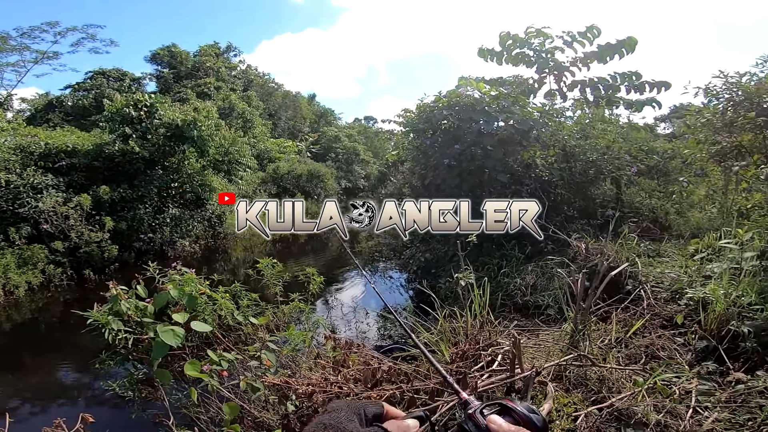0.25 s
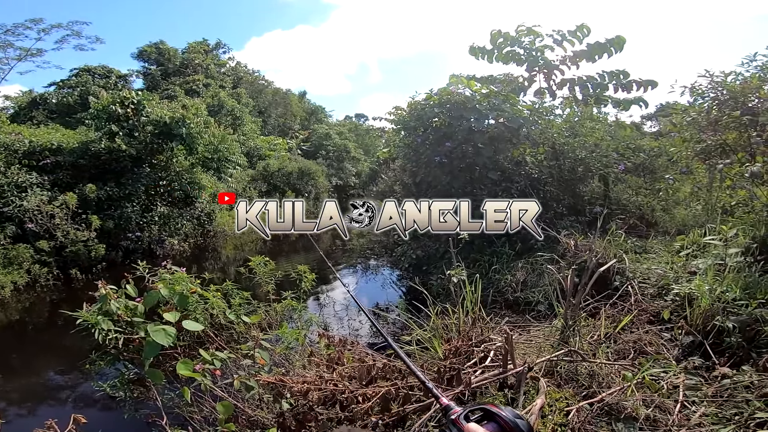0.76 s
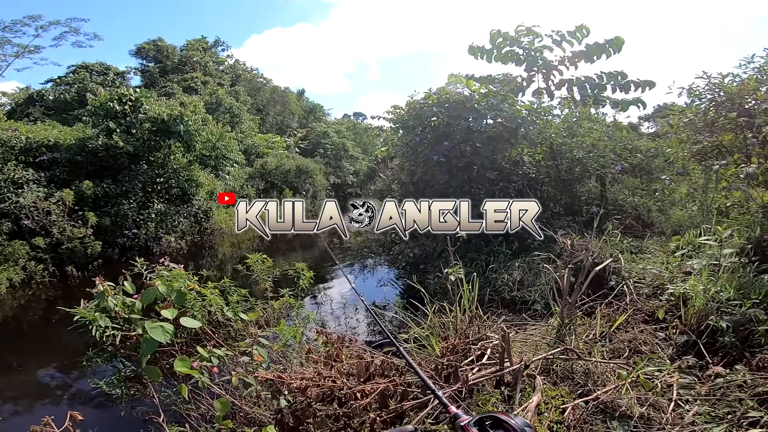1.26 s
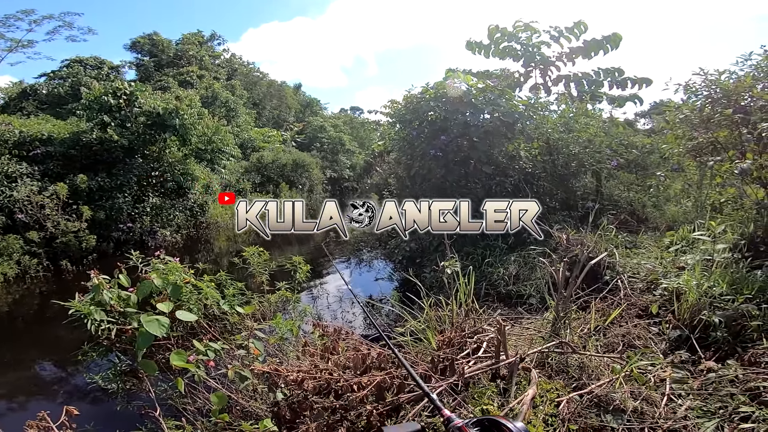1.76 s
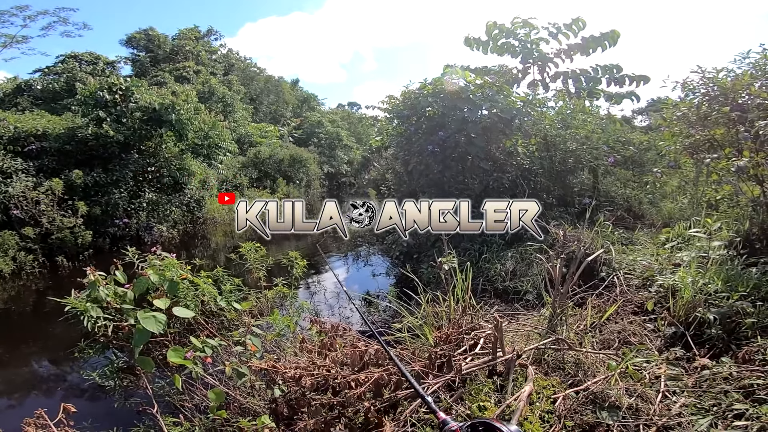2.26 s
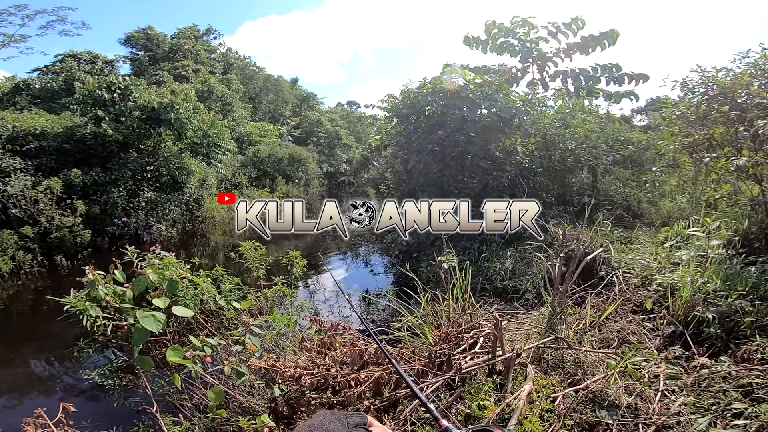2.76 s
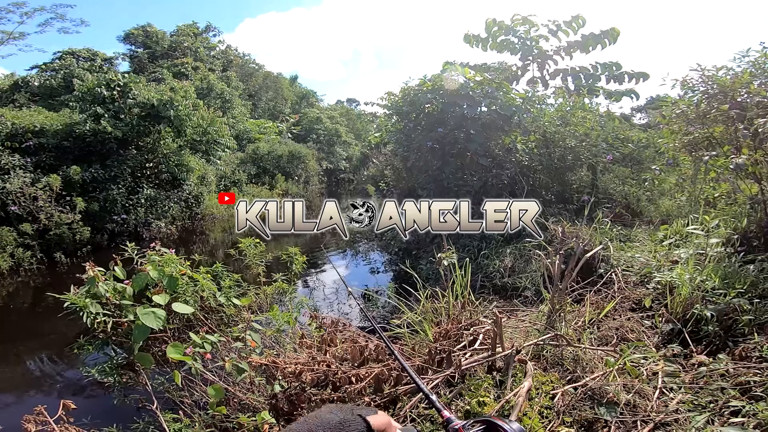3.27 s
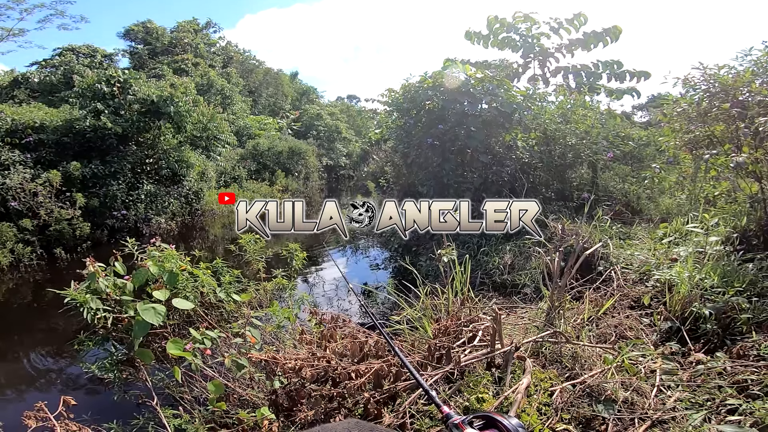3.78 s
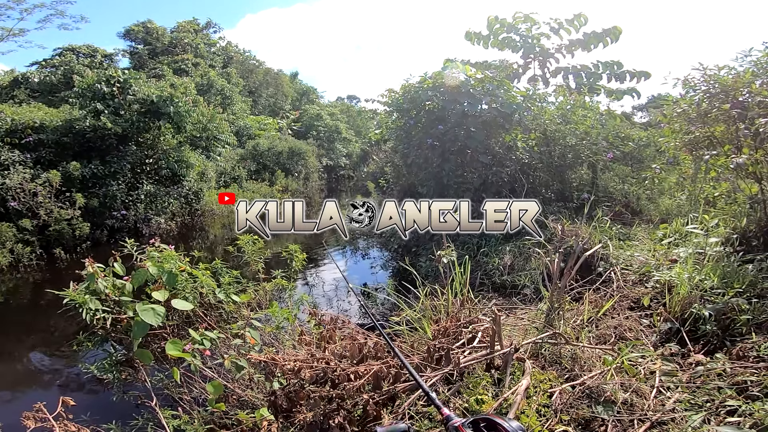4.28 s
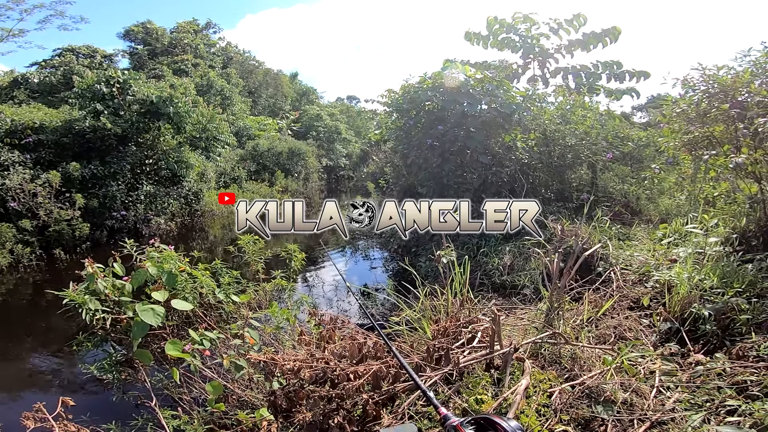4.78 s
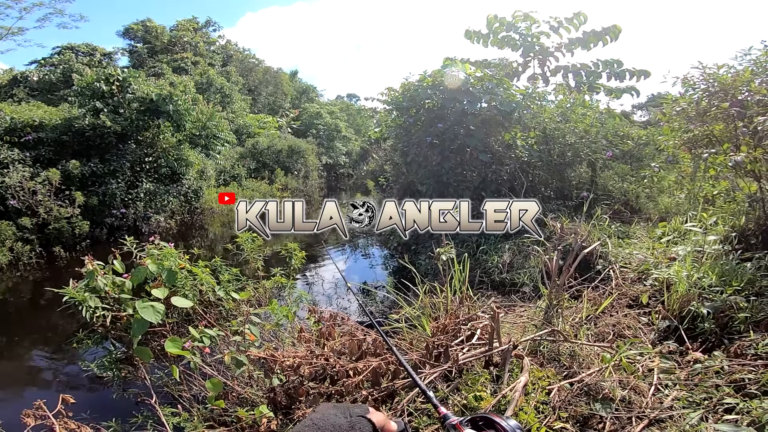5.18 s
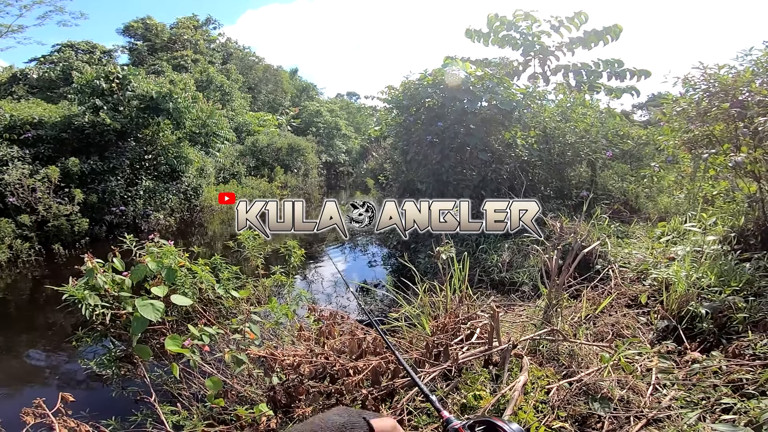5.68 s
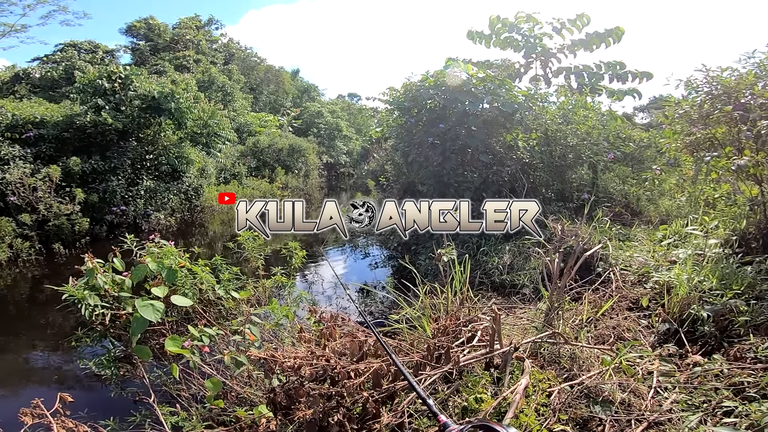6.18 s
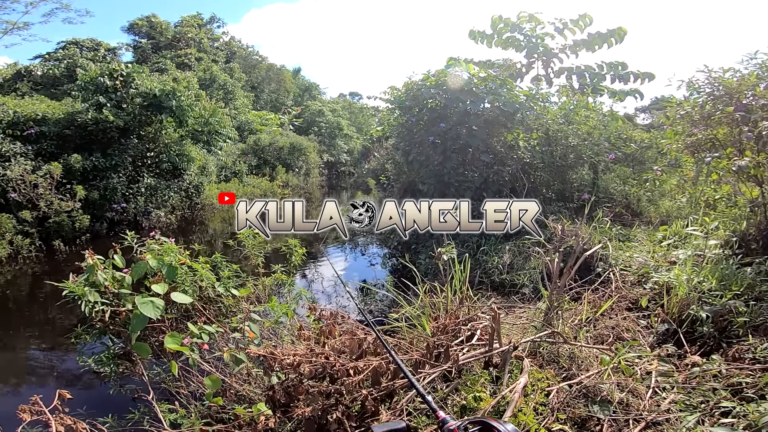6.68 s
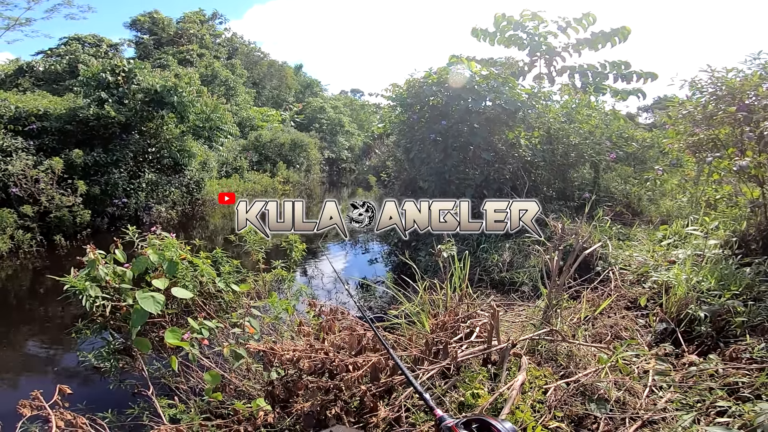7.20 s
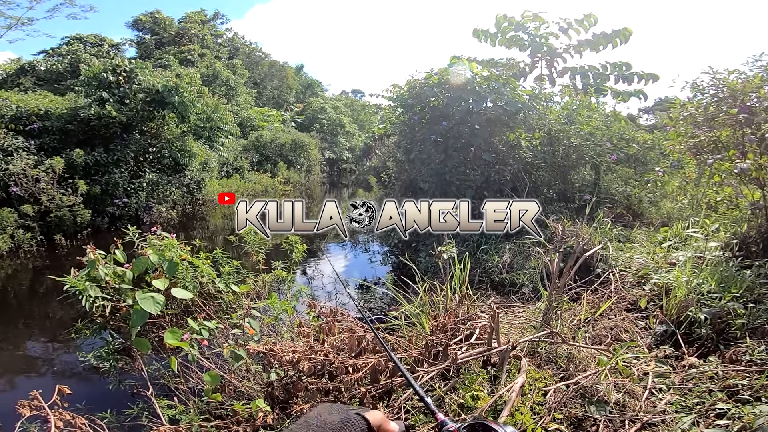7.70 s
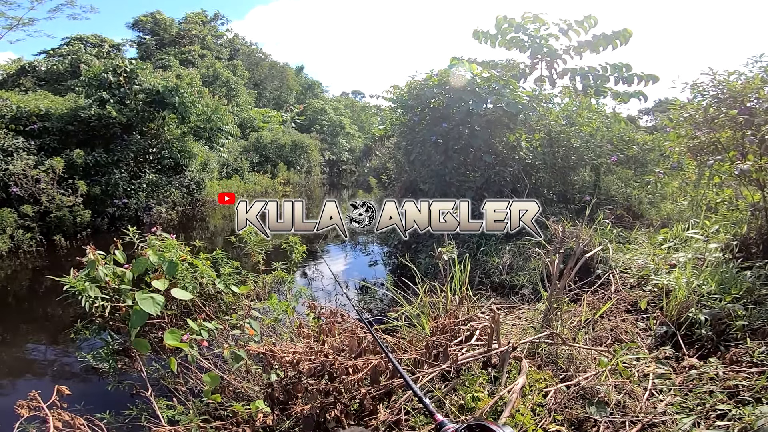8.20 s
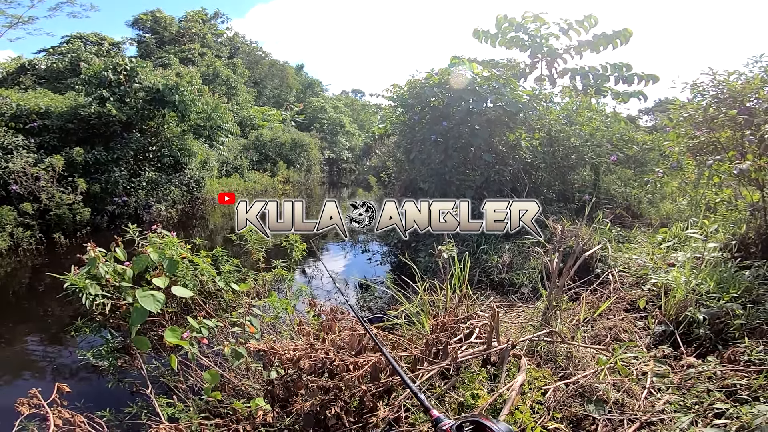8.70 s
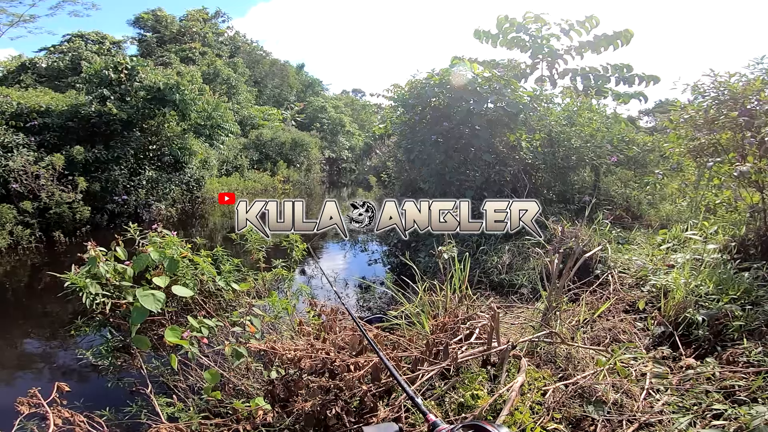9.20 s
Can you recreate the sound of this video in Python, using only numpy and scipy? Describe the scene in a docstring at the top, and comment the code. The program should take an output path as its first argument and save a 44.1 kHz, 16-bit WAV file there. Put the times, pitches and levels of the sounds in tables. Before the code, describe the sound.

A quiet outdoor pond bank: insects hum on a high pitch throughout, leaning left, over a light breeze in leaves. A distant motor drones and fades, while a second hums faintly, growing a little toward the end. Birds chatter harshly during the first second, and a fishing reel snaps shut close by at about 0.3 seconds. Small water plops follow from 1.3 to 2.2 seconds. From about 1.2 seconds a far bird pips softly, nearly three times a second. Around 2 seconds a cricket starts a fast, high trill on the left and keeps going, as the sound widens into stereo. The microphone is knocked lightly at 2.1, 4.4 and 5.2 seconds, the last with a squeaky rub. Birds chatter again from 4.6 to 6.2 seconds. Faint plops come near 7.6 seconds. Dry stems tick and cloth rustles here and there, more often after 8.5 seconds.

```python
"""Insects hum high in the reeds of a still swamp pond, their wings ringing in narrow bands.
A cricket starts up on the left, one tone per wing stroke, and far birds pip and chatter.
An angler's reel snaps shut, gear knocks and rubs on the microphone housing, dry stems and cloth
rustle, and air pockets ring as something plops in the water. Behind it all a distant motor
drones and fades, another hums on, and a light breeze stirs the leaves."""
import sys
import numpy as np
from scipy import signal
from scipy.fft import rfft, irfft
from scipy.io import wavfile
from scipy.ndimage import uniform_filter1d

SR = 44100
rng = np.random.default_rng(int(sys.argv[2]) if len(sys.argv) > 2 else 0)


def unload_audio(sound):
    """Save the sound as a 16-bit wav file, at the path given as the first command line argument."""
    columns = np.transpose(np.atleast_2d(sound))
    # keep every value between -1 and 1, then stretch to whole-number steps
    steps = np.round(np.clip(columns, -1, 1) * 32767)
    wavfile.write(sys.argv[1], SR, steps.astype(np.int16))


N = 416744
T = np.arange(N) / SR

# Table levels are relative: the functions add their own gain. Ring time is the time to fade by 60 dB.
# Kinds of insect. Each row: pitch in Hz, band width in Hz, level in dB, lean to the left in dB,
# pulses per second, pulse depth from 0 to 1.
INSECT_BANDS = [(7140, 450, -5, 13, 23, 0.34), (7190, 520, -4.5, -12, 90, 0.33),
                (6920, 500, -8.5, 19, 59.9, 0.2), (7570, 320, -13.5, 26.5, 120, 0.2),
                (5050, 1400, -11, 7, 16, 0.13), (9060, 730, -20, 2, 19.95, 0.1),
                (8080, 460, -15, 8, 30, .2)]
# How loud the insects are together. Each row: time in seconds, level in dB.
CHORUS_LEVEL = [(0, -64.5), (.6, -62.5), (2.3, -64.5), (3.4, -61.5), (6.5, -61), (9.45, -59.5)]
# The near cricket warms up, then holds steady. Each row: time in seconds, level in dB.
CRICKET_LEVEL = [(0, -81), (1.85, -68), (2.1, -56), (2.8, -51.5), (4.1, -49), (5.3, -52), (9.45, -51)]
# The near cricket's rests. Each entry: middle of the rest in seconds.
CRICKET_RESTS = [2.705, 3.825]
# Far crickets. Each row: pitch in Hz, level against the chorus in dB, chirps per second,
# lean to the left in dB, chirp length in beats, time of one chirp in seconds.
FAR_CRICKET_SONGS = [(8280, -11.5, 15.0, -4, .8, .02), (8100, -12.5, 15.6, 14, 0.65, 0.2),
                     (6080, -20, 31, 11.5, 1.3, 0), (4820, -17.5, 2.65, 11, .45, 7.05)]
# The chattering birds' notes. Each row: middle in seconds, level in dB, pitch in Hz,
# fall in Hz (negative rises), roughness (0 is pure), length in seconds.
CHATTER_NOTES = [(.023, -46, 3040, 600, 1.1, 0.046), (.12, -42, 2895, 1100, 0.7, .052),
                 (0.207, -41, 3100, -300, 0.6, 0.038), (0.401, -40, 2990, 350, 0.5, 0.043),
                 (.549, -47.5, 3110, -150, .7, 0.073), (.654, -43, 3000, 100, 0.66, 0.033),
                 (0.769, -44, 3040, 102, .64, 0.046), (0.898, -45.5, 3125, -150, 0.86, 0.066),
                 (4.572, -55, 2710, 600, .7, .052), (4.671, -50, 2485, 600, 0.6, 0.056),
                 (4.772, -49, 2610, 900, 0.7, 0.04), (4.875, -44, 2660, 1100, 0.8, 0.054),
                 (4.944, -42, 2620, -600, 0.3, 0.02), (4.979, -47, 2350, 950, 0.94, .07),
                 (5.071, -45, 2340, 797, 0.75, .052), (5.159, -42.5, 2600, 900, 1, .052),
                 (5.347, -47, 2370, 898, 0.83, .052), (5.433, -44.5, 2550, 1103, .7, 0.061),
                 (5.539, -44.5, 2606, 902, 0.9, .052), (5.631, -48, 2380, 1000, 0.75, .052),
                 (5.702, -49.5, 2690, 600, 0.8, .052), (5.829, -48.5, 2350, 1100, .8, .052),
                 (5.967, -48.5, 2540, 700, .7, .052), (6.135, -50, 2716, 500, 1, .052)]
# Hits inside the reel. Each row: start in seconds, level in dB, brightness in Hz.
REEL_HITS = [(0.231, -5, 660), (0.2327, -8, 600), (0.2562, -24, 3500), (0.2628, -22, 3000),
             (0.2661, -12.5, 6000), (0.2666, -10.5, 10000), (0.2671, -11, 4040), (0.2687, -21, 8000),
             (0.2736, -26, 8000), (0.2742, -21, 5000), (0.2778, -11, 3400), (0.2863, -31, 3000),
             (.3380, -19, 2600), (0.3393, -9, 1210), (0.34, -10, 696), (0.3523, 9, 170)]
# How the reel's frame rings. Each row: pitch in Hz, level in dB, ring time in seconds.
REEL_MODES = [(298, -34, 0.0089), (860, -17, 0.004), (1100, -24, 0.0033), (1730, -4.5, 0.0088),
              (2280, -3, 0.0068), (2770, 5, 0.0071), (3250, -1.5, 0.0074), (3860, -12, 0.02),
              (4550, -8.5, 0.013), (5600, -14.5, 0.0054), (6600, -5, 0.0031), (10440, 1, 0.0013)]
# Knocks on the housing. Each row: start in seconds, level in dB, brightness in Hz.
HOUSING_KNOCKS = [(2.0988, -15, 2620), (4.3567, -13, 2630), (5.2264, -14.5, 1910)]
# How the housing rings. Each row: pitch in Hz, level in dB, ring time in seconds.
HOUSING_MODES = [(420, -29, 0.038), (780, -21, .014), (1001, 7, 0.02), (1410, -12, 0.022),
                 (1560, -4, 0.011), (1870, -33, .016), (2230, -17, 0.042), (3070, -11, 0.02),
                 (3420, -18, 0.0067), (5600, -21, 0.014)]
# The jolt of the whole device. Each row: pitch in Hz, level in dB, ring time in seconds.
JOLT_MODES = [(373, -25.5, 0.022)]
# Clothing rubs the housing. Each row: middle in seconds, level in dB, length in seconds.
CLOTH_RUBS = [(2.266, -50, 0.037), (3.69, -45.5, 0.046), (5.266, -34.5, 0.046), (6.967, -50, 0.055),
              (7.535, -46.5, 0.057), (7.761, -49, 0.037), (8.57, -48, 0.057), (9.24, -50, 0.044),
              (9.376, -49, 0.088)]
# Rubbing squeaks. Each row: middle in seconds, level in dB, length in seconds, pitch in Hz, glide in Hz.
RUB_SQUEAKS = [(5.241, -40, 0.01, 2520, -90), (5.253, -39, .005, 2400, 0), (5.247, -36, .008, 1320, 63),
               (5.269, -25.5, .011, 983, 4), (5.29, -38, 0.009, 1310, 0), (6.978, -48, .055, 1080, -320),
               (6.95, -52, .05, 1510, -450), (8.583, -47, 0.0242, 982, 82), (8.802, -49, .028, 1020, 66),
               (8.863, -49, 0.038, 2020, 160), (9.39, -46, 0.014, 1290, 62)]
# Plops. Each row: start in seconds, level in dB, starting pitch in Hz, thud against the ring in dB.
WATER_PLOPS = [(1.303, -35.5, 773, -4), (1.316, -35, 653, -4), (1.332, -43, 1650, -20),
               (1.344, -43, 668, 2), (1.371, -43, 700, -2), (1.3735, -46, 1250, -12), (1.454, -44, 804, -8),
               (1.497, -45, 950, -10), (1.512, -45, 980, -15), (1.629, -37.5, 847, -9),
               (1.643, -40, 821, -12), (1.688, -45, 1080, -6), (1.697, -41, 860, -4), (1.715, -39, 740, -5),
               (1.763, -34.5, 785, -9), (1.982, -46, 1130, -10), (2.225, -45.5, 1450, -20),
               (7.513, -48, 1016, -10), (7.658, -46, 1262, -20), (7.768, -53, 1016, -12)]
# Stems and cloth rustle. Each row: middle in seconds, level in dB, length in seconds, pitch in Hz.
CLEAR_RUSTLES = [(0.035, -52.5, 0.18, 2550), (0.746, -59.5, 0.23, 1820), (1.339, -51, 0.043, 580),
                 (1.45, -56.5, 0.1, 1540), (1.72, -54, 0.068, 1100), (1.981, -47, 0.018, 1080),
                 (2.123, -47, 0.037, 347), (2.315, -63, .06, 1500), (2.366, -55.5, 0.13, 382),
                 (3.957, -59, 0.23, 390), (5.263, -52, 0.04, 2300), (6.962, -61, .06, 2200),
                 (7.73, -61, 0.08, 1217), (8.815, -57.5, 0.15, 2050), (9.068, -57, 0.038, 800),
                 (9.12, -58, .06, 1700), (9.40, -57, 0.066, 2220)]
# Dry stems tick. Each row: start in seconds, level in dB, factor on the stem's pitches.
STEM_TICKS = [(.6548, -39, 0.98), (.8613, -41, .8), (1.3026, -40, 1.17), (1.8863, -30.5, 0.85),
              (2.735, -39.5, 1), (3.341, -40, 0.88), (3.722, -45, 1.4), (3.94, -37, 0.82),
              (4.041, -44, 1.1), (4.3087, -39, 1.16), (5.219, -38, 0.7), (5.26, -33, 0.76),
              (5.2655, -35, 0.78), (5.2837, -35, 0.9), (5.294, -42, .85), (5.525, -40, 1.1),
              (6.7698, -38, .98), (6.7708, -41, 1.2), (7.26, -45, 0.7), (7.658, -42, 0.56),
              (7.71, -39, .45), (7.723, -41, .85), (7.768, -45, .55), (8.556, -42, 0.8), (8.577, -38, 0.89),
              (8.743, -38, 0.8), (8.769, -40, 0.89), (8.7997, -39, 0.84), (8.826, -42, 0.72),
              (8.871, -41, .8), (9.088, -44, 1.05), (9.125, -42, 0.61), (9.345, -41, 0.59),
              (9.365, -37, 0.83), (9.388, -43, 0.83)]
# How a dry stem rings. Each row: pitch in Hz, level in dB, ring time in seconds.
STEM_MODES = [(1830, 6.5, 0.0056), (2500, 3.5, .007), (3200, 8.5, 0.0056), (4500, 0, 0.0022),
              (5550, -5, 0.0049), (8900, -17, 0.0034)]
# How loud the motor's dull noise is. Each row: time in seconds, level in dB.
WASH_LEVEL = [(0, -52.5), (.6, -55), (1.05, -57.5), (1.4, -52), (2.1, -51), (2.6, -58), (4.0, -60),
              (4.6, -63), (5.8, -61.5), (6.3, -65.5), (7.4, -61.5), (8.6, -64.5), (9.2, -60), (9.45, -61)]
# The colour of that noise. Each row: frequency in Hz, level in dB.
WASH_SPECTRUM = [(76, -48), (130, -8.5), (157, -1.5), (231, -4), (289, -8), (510, -14.5), (592, -8.5),
                 (960, -16.5), (1200, -45), (1560, -62), (2640, -120)]
# The second engine. Each row: time in seconds, pitch in Hz, note level in dB, throb level in dB.
ENGINE_RUN = [(0, 134, -78, -86), (2.7, 131, -72, -81), (3.6, 127.2, -70, -68), (4.9, 126, -68, -73),
              (5.3, 122, -63, -66), (6.1, 120, -66, -61), (6.6, 119.9, -71.5, -81),
              (7.3, 120.6, -64.5, -64), (8.3, 126.7, -66.5, -66), (9.1, 132.6, -63, -57),
              (9.45, 131, -66, -55)]
# Moving air. Each row: time in seconds, rumble level in dB, leaf level in dB.
BREEZE_LEVELS = [(0, -60.5, -57), (.75, -68.5, -56), (1.1, -65, -58.5), (1.9, -66, -56.5),
                 (2.7, -69.5, -61), (4.3, -67, -60.5), (4.95, -69, -60.5), (5.7, -66, -61.5),
                 (6.8, -66.5, -60.5), (8.1, -62.5, -62.5), (9.1, -60.5, -59), (9.45, -59, -59.5)]
# Soft low thumps as the recorder is handled. Each row: middle in seconds, level in dB.
HANDLING_BUMPS = [(.1, -54), (.36, -53), (1.32, -60), (1.8, -54), (2.11, -54), (2.45, -61), (4.42, -63),
                  (5.76, -60), (3.97, -60), (5.29, -58), (6.22, -57.5), (7.99, -55), (9.09, -54),
                  (9.32, -56)]
# Open air from all around. Each row: frequency in Hz, level in dB.
OPEN_AIR_SPECTRUM = [(30, -19), (100, -10.5), (160, -5), (475, -11.5), (800, -5.5), (1300, -6), (1710, -11),
                     (2900, -14), (4100, -28), (5000, -28), (6000, -27), (8500, -17), (11000, -44),
                     (15000, -37)]
# Stereo spread. Each row: time in seconds, width from 0 (mono) to 1 (full).
STEREO_WIDTH = [(0, 0.0083), (1.9, 0.0085), (2.09, 0.44), (3.0, 0.85)]


def insect_chorus():
    """Many wings ring in narrow bands, each kind pulsing at its own rate."""
    level, = in_time(CHORUS_LEVEL)
    out = 0
    for hz, width_hz, db, pan_db, per_s, depth in INSECT_BANDS:
        white = rng.standard_normal((3, N))   # left, right and shared
        wings = resonate(white[2] + white[:2], hz, width_hz)
        pulse = 1 + depth * np.sin(2 * np.pi * per_s * T + 0.94 * drift(1.86))
        out = out + panned(wings * pulse * from_db(db), pan_db)
    return out * from_db(level)


def crickets(rest_s=.14):
    """One cricket sings close on the left; others, far off, swell with the chorus."""
    level, = in_time(CRICKET_LEVEL)
    chorus_db, = in_time(CHORUS_LEVEL)
    singing = np.all([abs(T - s) > rest_s / 2 for s in CRICKET_RESTS], axis=0)
    song = chirps(hz=7728, per_s=15.125, chirp_s=3.131, fall_hz=150, duty=0.55, rough=0.07, waver_hz=10)
    near = singing * from_db(level - 8.5) * song
    out = panned(trees(near, wet_db=-12, t60=0.19), pan_db=15)
    for hz, db, per_s, pan_db, duty, chirp_s in FAR_CRICKET_SONGS:
        far = chirps(hz, per_s, chirp_s, fall_hz=70, duty=duty, rough=0.34, waver_hz=35)
        out = out + panned(from_db(chorus_db + db + 1.7 * drift(3.05)) * far, pan_db)
    return out


def chirps(hz, per_s, chirp_s, fall_hz, duty, rough, waver_hz):
    """Each wing stroke makes one nearly pure tone, which sinks as the wing slows."""
    stroke = ((T - chirp_s) * per_s + .5) % 1 - .5   # 0 in the middle of each stroke
    pitch = hz - fall_hz * stroke / duty + waver_hz * drift(90)
    swell = np.exp(-2 * (2 * stroke / duty) ** 2)
    unevenness = (1 + rough * drift(200)) * from_db(.6 * drift(9.9))
    return swell * unevenness * tone(pitch)


def pipping_bird(count=23, first_s=1.234, gap_s=.3605, slowing_s=.00106, end_hz=3140, drop_hz=330):
    """A far bird repeats a hoarse, dropping whistle ever more slowly; the far bank echoes it."""
    out, k = np.zeros(N), np.arange(count)
    progress = np.linspace(0, 1, int(0.0684 * SR))
    times = first_s + gap_s * k + slowing_s * k * (k - 1) / 2
    for s, (sharp, strong, steep) in zip(times, rng.standard_normal((count, 3))):
        db = -61.2 + 4.5 * np.exp((first_s - s) / 0.92) + 1.5 * strong   # it starts out stronger
        waver = 70 * rms_one(uniform_filter1d(rng.standard_normal(len(progress)), size=60))
        drop = drop_hz * (1 + .2 * steep) * (1 - progress) ** 1.4
        pitch = end_hz * (1 + 0.004 * sharp) + drop + waver
        add(out, s, from_db(db) * np.sin(np.pi * progress) * tone(pitch))
    out *= from_db(2.5 * drift(140))   # the level flutters
    echo = from_db(-9) * delayed(out, .055)
    return trees(out + echo, wet_db=-6.5, t60=.5)


def chattering_birds(rasp_hz=330, upper_ratio=1.42):
    """A fast, uneven flutter shakes each whistle into a harsh note, with a faint second voice above."""
    out = np.zeros(N)
    shake = tone(rasp_hz * (1 + .25 * drift(300)))
    jitter = 1.1 * shake + 1.15 * drift(800)   # flutter and hoarseness, in radians
    for s, db, hz, fall_hz, rough, length in CHATTER_NOTES:
        progress = np.linspace(0, 1, int(length * SR))
        start = max(int((s - length / 2) * SR), 0)
        part = slice(start, start + len(progress))
        phase = 2 * np.pi * np.cumsum(hz + fall_hz * (.5 - progress)) / SR + rough * jitter[part]
        voices = np.sin(phase) + from_db(-20) * np.sin(upper_ratio * phase)
        swell = np.sin(np.pi * progress) ** 1.6 * (1 + 0.41 * rough * shake[part])
        out[part] += from_db(db) * swell * voices
    out *= from_db(2 * drift(220))   # the level flickers
    far = filtered(out, "lowpass", hz=4000, order=3)   # leaves soak up the treble
    return trees(far, wet_db=-5, t60=0.94)


def reel(scrape_s=0.2703, rebound_s=.0026, rebound_loss_db=17):
    """The reel's catch slides and snaps home, each hit bouncing once; the small frame gives no bass."""
    scrape = from_db(-45) * rng.standard_normal(N) * np.exp(-abs((T - scrape_s) / 0.01) ** 0.83)
    rebounds = [(s + rebound_s * rng.uniform(0.71, 1.28), db - rebound_loss_db, cut_hz)
                for s, db, cut_hz in REEL_HITS]
    frame = ring(from_db(-1) * contacts(REEL_HITS + rebounds) + scrape, REEL_MODES)
    return filtered(frame, "highpass", hz=210, order=4)


def housing(port_lag_s=.00008):
    """Knocks and rubs flex the microphone housing, pushing its two openings in opposite directions."""
    pressure = sum(from_db(db) * bump(s, length) for s, db, length in CLOTH_RUBS)
    friction = noise([(150, -17), (600, -5), (1000, 10.5), (1350, 6.5), (1900, -3), (3000, -16),
                      (4500, -24), (12000, -65)])
    rub = rms_one(friction * from_db(3 * drift(250)))
    knocks = contacts(HOUSING_KNOCKS)
    shell = ring(knocks, HOUSING_MODES) + pressure * rub + squeaks()
    shell = filtered(shell, "highpass", hz=330, order=4)   # a small stiff shell gives no bass
    return np.array([-delayed(shell, port_lag_s), shell]) + ring(knocks, JOLT_MODES)


def squeaks(waver_hz=50):
    """Where a rub sticks and slips evenly, it sings briefly on one gliding note."""
    out, waver = np.zeros(N), waver_hz * drift(250)
    for s, db, length, hz, glide_hz in RUB_SQUEAKS:
        near = abs(T - s) < 2 * length
        offset = (T[near] - s) / length
        pitch = hz + glide_hz * offset + waver[near]
        out[near] += from_db(db) * np.exp(-2 * offset ** 2) * tone(pitch)
    return out * from_db(3 * drift(300))


def plops(ring_cycles=30, rise=1.7, attack_s=0.00047, thud_hz=380, thud_t60=0.017):
    """A touch on the water thuds, and an air pocket rings with rising pitch; small ones die soonest."""
    out, t = np.zeros(N), T[:SR // 10]
    thud = np.sin(2 * np.pi * thud_hz * t) * from_db(-60 * t / thud_t60)
    onset = 1 - np.exp(-t / attack_s)
    for s, db, hz, thud_db in WATER_PLOPS:
        pocket = from_db(-60 * t * hz / ring_cycles) * np.sin(2 * np.pi * hz * (t + rise * t * t))
        add(out, s, from_db(db + 4) * onset * (pocket + from_db(thud_db) * thud))
    return trees(out, wet_db=-13, t60=0.25)


def rustles(slips_per_s=500):
    """Each rustle of stems or cloth is a swarm of tiny slips of uneven size."""
    out, t = np.zeros(N), T[:SR // 2] - .25
    for s, db, length, hz in CLEAR_RUSTLES + faint_rustles():
        slips = rng.standard_normal(len(t)) * (0.032 + (rng.random(len(t)) < slips_per_s / SR))
        burst = resonate(slips, hz, width_hz=0.72 * hz) * np.exp(-2 * (t / length) ** 2)
        add(out, s + t[0], from_db(db) * burst[s + t >= 0])
    return filtered(out, "lowpass", hz=6500, order=2)


def faint_rustles(count=30, db=-60, length_s=0.014, hz=1810, spread_octaves=0.29):
    """Small stirrings come at random, as rows like those of CLEAR_RUSTLES."""
    times = (np.arange(count) + rng.random(count)) * T[-1] / count
    return [(s, db + strong, length_s, hz * 2 ** (spread_octaves * bright))
            for s, (strong, bright) in zip(times, rng.standard_normal((count, 2)))]


def stem_ticks(faint_count=36):
    """Dry stems tick now and then, with fainter ticks at random; thicker stems ring lower."""
    out = np.zeros(N)
    faint = [(when * T[-1], -57 + 12 * strong, .5 + 0.66 * thin)
             for when, strong, thin in rng.random((faint_count, 3))]
    for s, db, ratio in STEM_TICKS + faint:
        snap = from_db(db - 9) * signal.unit_impulse(SR // 20)
        add(out, s, ring(snap, [(hz * ratio, level, t60) for hz, level, t60 in STEM_MODES]))
    return trees(out, wet_db=-10, t60=.1)


def fading_motor(hz=152.5, width_hz=18, waver_hz=2.5, fade_db_per_s=3):
    """A motor moves away, its note smeared by distance, over dull noise; one surge adds overtones."""
    wash_db, = in_time(WASH_LEVEL)
    fade = from_db(-50.5 - fade_db_per_s * T)
    white = rng.standard_normal(N)
    note = from_db(-5 + 2 * drift(3.5)) * tone(hz + waver_hz * drift(4))
    smear = from_db(-4) * resonate(white, hz, width_hz)
    overtones = resonate(white, 2 * hz, 4 * width_hz) + resonate(white, 4 * hz, 6 * width_hz)
    surge = from_db(-54) * bump(s=0.53, length=0.33)
    wash = from_db(wash_db + 1) * noise(WASH_SPECTRUM)
    return fade * (note + smear) + surge * overtones + wash


def labouring_engine(throb_hz=54, waver_db=2.5):
    """A second engine slows, then picks up, over a deep throb; both levels waver with the distance."""
    hz, note_db, throb_db = in_time(ENGINE_RUN)
    note = from_db(note_db + waver_db * drift(4.5)) * tone(hz)
    throb = from_db(throb_db + waver_db * drift(5)) * tone(throb_hz + 1.43 * drift(6))
    return note + throb


def air_and_handling(bump_s=0.05):
    """Air rumbles and stirs far leaves over a thin, wide hiss; handling adds soft low thumps."""
    rumble_db, leaves_db = in_time(BREEZE_LEVELS)
    bumps = sum(from_db(db) * bump(s, bump_s) for s, db in HANDLING_BUMPS)
    push = from_db(rumble_db + 2.5 * drift(12)) + bumps
    rumble = noise([(10, -43), (30, -12), (55, -1.5), (72, -2.5), (125, -9), (200, -13), (400, -27),
                    (900, -68)])
    leaves = noise([(100, -22), (250, 1.5), (500, 4.5), (1000, 3), (1400, 6.5), (2000, 1), (2650, 7),
                    (3200, -0.5), (4000, -9), (6000, -23.5), (9500, -15.5), (12000, -48)])
    hiss = from_db(-76) * noise([(300, 3), (9000, -5.5), (11000, -31), (15000, -4.5)])
    wide = from_db(-59 + drift(16)) * noise(OPEN_AIR_SPECTRUM) * [[1], [-1]]   # opposite in each ear
    breeze = from_db(leaves_db + 3 + 1.73 * drift(16))
    return from_db(2) * push * rumble + breeze * leaves + hiss + wide


def trees(x, wet_db, t60):
    """Trees round the pond scatter a sound into a fading tail, different on each side."""
    t = T[:SR]
    tail = rng.standard_normal((3, SR)) * from_db(-60 * t / t60) * (t > .015)
    tail = tail[:2] * .5 + tail[2]
    tail /= np.sqrt(np.sum(tail ** 2, axis=1, keepdims=True))
    return x + from_db(wet_db) * signal.fftconvolve([x], tail, axes=1)[:, :N]


def contacts(rows):
    """Each hit is a rounded push; a softer, duller one lasts longer."""
    out, t = np.zeros(N), T[1:SR // 100]
    for s, db, cut_hz in rows:
        push = t * np.exp(-2 * np.pi * cut_hz * t)
        add(out, s, from_db(db) * push / push.sum())
    return out


def ring(force, modes):
    """A force sets a body's own tones (modes) ringing; neighbours swing in opposite directions."""
    out = 0
    for k, (hz, db, t60) in enumerate(modes):
        decay, angle = from_db(-60 / (t60 * SR)), 2 * np.pi * hz / SR
        feedback = [1, -2 * decay * np.cos(angle), decay * decay]
        out = out + (-1) ** k * from_db(db) * signal.lfilter([0, np.sin(angle)], feedback, force + 1e-18)
    return out


def resonate(x, hz, width_hz):
    """Keep one band of a sound by passing it twice through a resonance; strength 1."""
    r = np.exp(-np.pi * width_hz / SR)
    section = [1 - r, 0, r - 1, 1, -2 * r * np.cos(2 * np.pi * hz / SR), r * r]
    return rms_one(signal.sosfilt([section, section], x))


def noise(spectrum):
    """Steady noise of strength 1, coloured by pairs of frequency in Hz and level in dB."""
    hz, db = np.transpose(spectrum)
    bins_hz = np.fft.rfftfreq(N, 1 / SR) + 1
    gain = from_db(np.interp(np.log(bins_hz), np.log(hz), db))
    return rms_one(irfft(rfft(rng.standard_normal(N)) * gain, N))


def drift(per_s):
    """A random wander of strength 1 that turns per_s times a second."""
    knots = rng.standard_normal(int(N / SR * per_s) + 3)
    return rms_one(np.interp(T * per_s, np.arange(len(knots)), knots))


def bump(s, length):
    """A smooth swell of height 1 around time s."""
    out, near = np.zeros(N), abs(T - s) < 2 * length
    out[near] = np.exp(-2 * ((T[near] - s) / length) ** 2)
    return out


def tone(hz):
    """A pure tone that follows a changing pitch."""
    return np.sin(2 * np.pi * np.cumsum(hz) / SR)


def filtered(x, kind, hz, order):
    return signal.sosfilt(signal.butter(order, hz, kind, fs=SR, output="sos"), x)


def delayed(x, s):
    return np.interp(T - s, T, x)


def from_db(db):
    return 10 ** (np.asarray(db) / 20)


def rms_one(x):
    """Scale a signal to an average strength (rms) of 1."""
    return x / np.sqrt(np.mean(x ** 2) + 1e-20)


def in_time(rows):
    """Join a table's timed rows with straight lines, giving one curve per value column."""
    s, *columns = np.transpose(rows)
    return [np.interp(T, s, column) for column in columns]


def panned(x, pan_db):
    return x * from_db([[pan_db / 2], [-pan_db / 2]])


def add(out, s, x):
    """Lay a short sound into a track at time s."""
    i = max(int(s * SR), 0)
    out[i:i + len(x)] += x[:N - i]


def scene():
    """Wildlife, the angler and the water sound over the air and two far engines."""
    wildlife = insect_chorus() + crickets() + pipping_bird() + chattering_birds()
    angler = reel() + housing() + rustles() + stem_ticks()
    background = air_and_handling() + fading_motor() + labouring_engine()
    return wildlife + angler + plops() + background


def record(dry, cutoff_hz=15000):
    """The sound opens from nearly mono to stereo, and the highest treble is cut."""
    width, = in_time(STEREO_WIDTH)
    mid = dry.mean(axis=0)
    treble_cut = signal.ellip(10, .1, 80, cutoff_hz, fs=SR, output="sos")
    return signal.sosfilt(treble_cut, mid + width * (dry - mid))


dry = scene()
out = record(dry)
unload_audio(out)
```